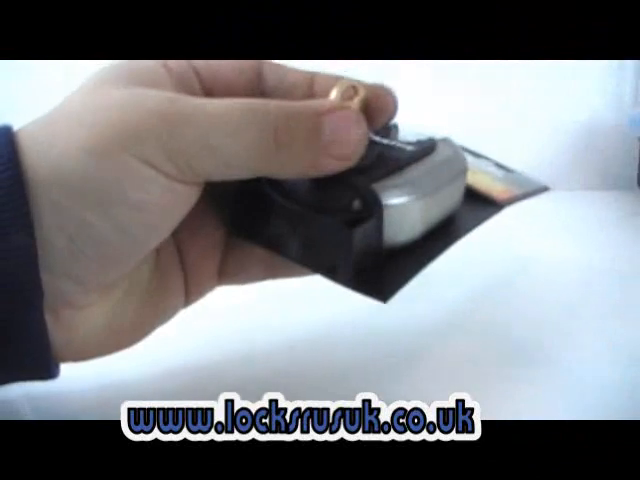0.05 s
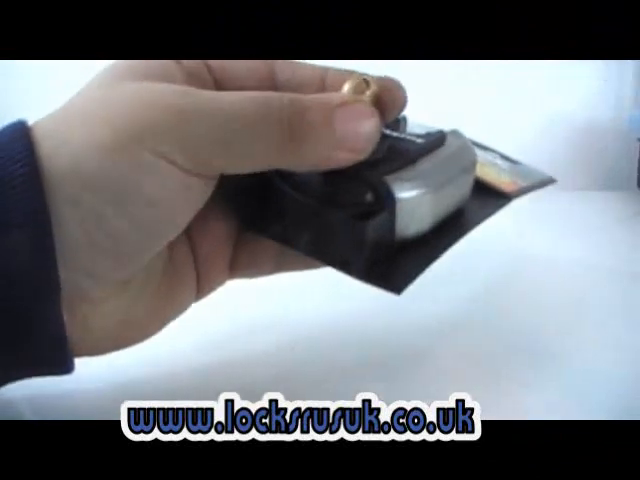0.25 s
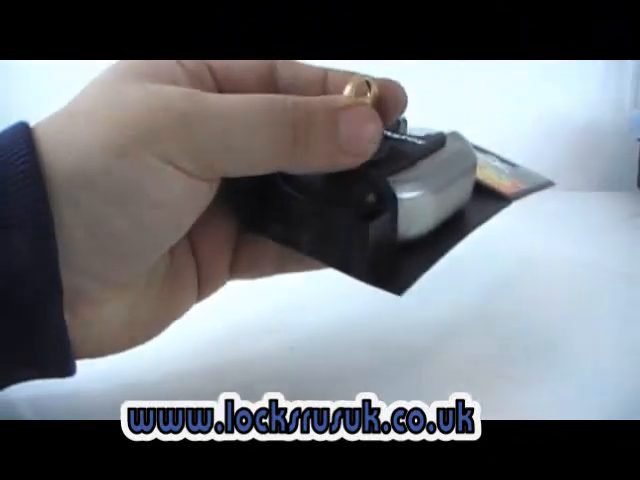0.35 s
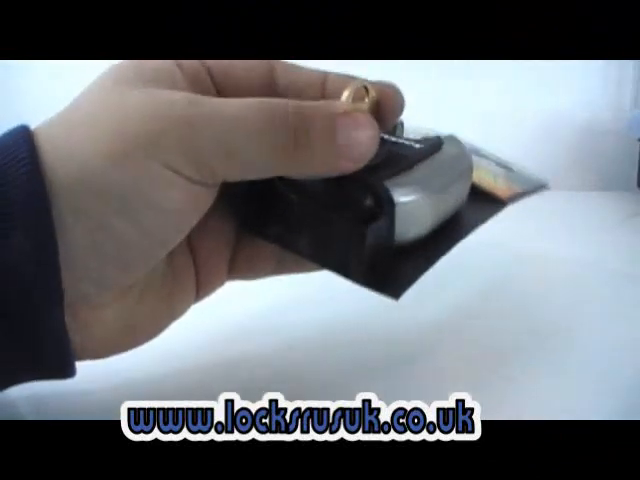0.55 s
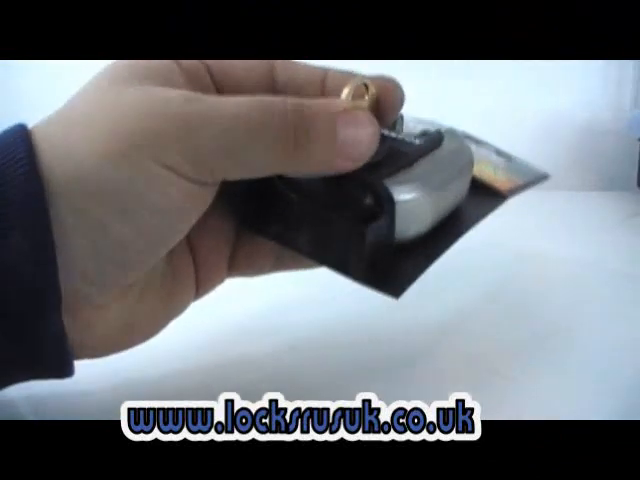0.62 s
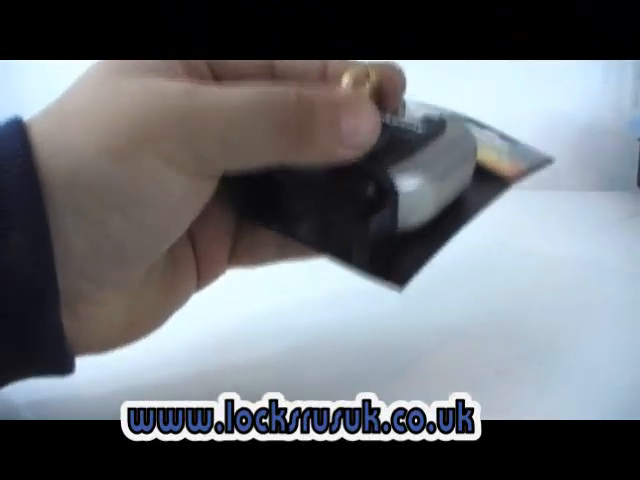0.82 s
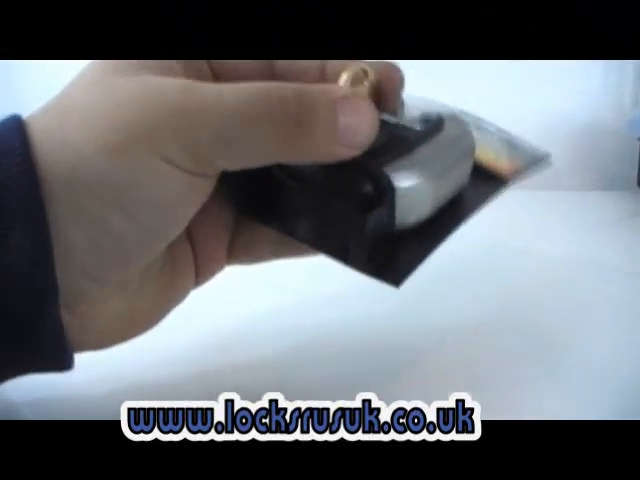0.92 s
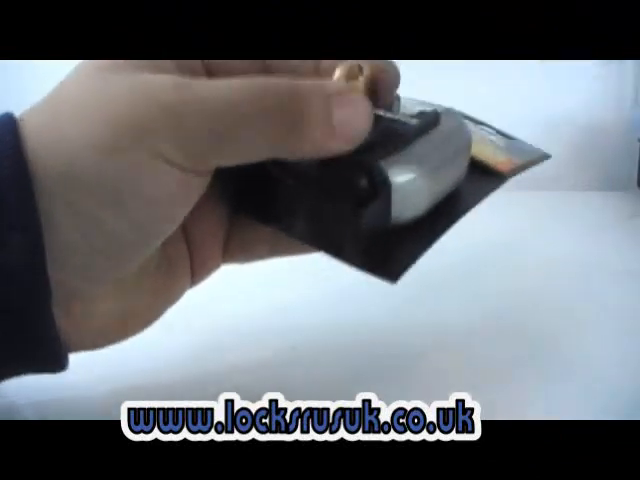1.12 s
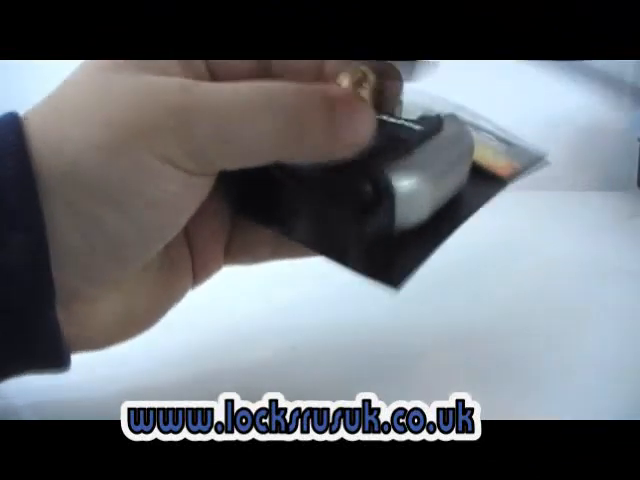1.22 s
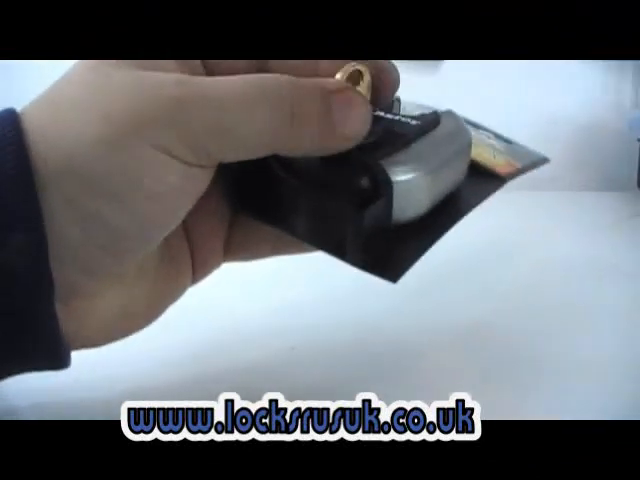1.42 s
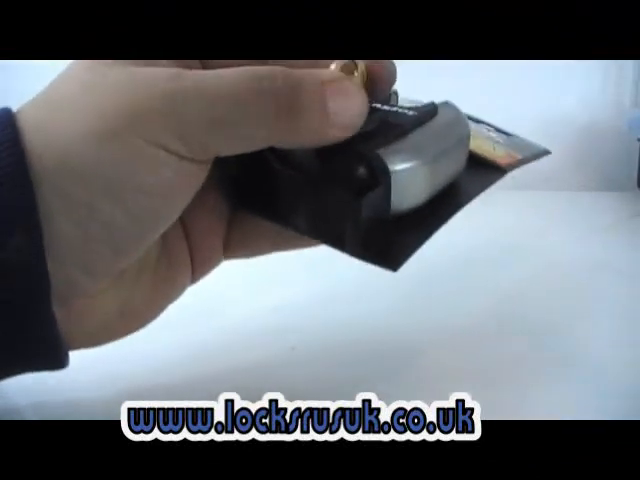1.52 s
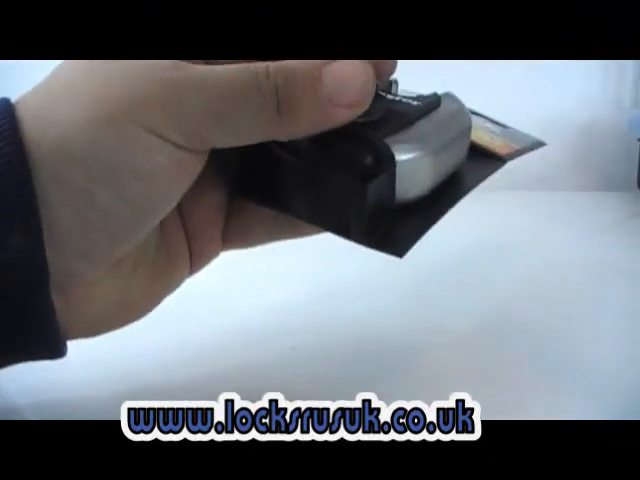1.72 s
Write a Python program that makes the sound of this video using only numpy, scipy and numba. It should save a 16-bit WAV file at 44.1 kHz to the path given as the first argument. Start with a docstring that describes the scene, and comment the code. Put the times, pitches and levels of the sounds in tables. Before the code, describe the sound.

Eight quick, sharp metal clicks with a slight rattle come from a hand-held padlock.

```python
"""A quiet room, a small camera microphone close to a hand-held padlock that is tapped eight times.
Each tap cracks on the lock body, rings its plastic case and thumps the hand; the loose steel parts
then bounce a few times. The room rings on behind, over soft air and a faint hum. The loudest taps
overload the input, and gain control turns the room noise down."""
import sys
import numpy as np
from scipy import signal
from scipy.fft import rfft, irfft
from scipy.io import wavfile
from numba import njit

SR = 44100
rng = np.random.default_rng(int(sys.argv[2]) if len(sys.argv) > 2 else 0)


def bounce(signal):
    """Save signal as a 16-bit WAV file at the path given by the first command-line argument."""
    frames = np.transpose(np.atleast_2d(signal))
    limited = np.clip(frames, -1, 1)
    pcm = np.round(limited * 32767).astype(np.int16)
    wavfile.write(sys.argv[1], SR, pcm)


N = 77175

# Taps on the lock. Each row: start in seconds, level in dB, thump offset in dB, case offset in dB,
# brightness of the body in dB per octave.
LOCK_TAPS = [(.2145, -17, 3, 6.5, -5.5), (0.4045, -4.5, 2.5, -6, 1.5), (0.5888, -1, -12, -1.5, -2),
             (.7657, 0.5, -0.5, -5, 0.5), (.9371, 1.5, -6, -7.5, 0), (1.105, 1, -33, -0.5, 1.5),
             (1.2793, 1, -7, -1.5, -5.5), (1.4597, 1, -5.5, -2, 1.5)]
# Bounces of the loose steel parts. Each row: landing time in seconds, level in dB.
STEEL_BOUNCES = [(.2192, -30), (0.2215, -26), (0.4121, -9.5), (0.417, -16), (0.4213, -9.5), (0.4399, -8),
                 (0.5953, -4), (.6056, -14), (0.623, -5.5), (0.6271, -10), (0.7722, -1), (0.782, -14),
                 (0.7968, -4.5), (0.8167, -14.5), (0.9421, -1.5), (0.9516, -7), (0.961, -20), (0.9677, -1),
                 (0.989, -17), (1.1112, 1.5), (1.1196, -3), (1.137, 1), (1.1575, -5.5), (1.285, 3),
                 (1.2944, -30), (1.3123, 1), (1.3342, -28), (1.338, -12), (1.4646, -0.5), (1.4753, -7),
                 (1.4909, -11.5), (1.6795, -27.5), (1.687, -31.5)]
# Modes of the lock body, the plastic case and the loose steel.
# Each row: frequency in Hz, level in dB, seconds to fall by 60 dB.
BODY_MODES = [(2142, -11.5, .012), (2910, -7.5, 0.012), (4284, 1, 0.0083), (4400, -19.5, 0.019),
              (5020, -2.5, .013), (5810, -2, 0.0059), (6700, -1.5, 0.012), (7260, -3, 0.014),
              (8020, -7, 0.015), (9250, -2, 0.01), (10330, -17.5, 0.024)]
CASE_MODES = [(410, -33, 0.3), (646, -24, 0.22), (659.7, -4.5, 0.021), (890, 2, 0.0097), (1319, 1, 0.011),
              (1880, -6.5, 0.011)]
STEEL_MODES = [(2338, -6.5, 0.022), (3140, -12, 0.055), (4260, 1.5, 0.016), (4533, -3.5, 0.017),
               (4680, -8.5, 0.0072), (4833, 3, 0.016), (5225, 2, 0.021), (6120, -1.5, 0.0094),
               (6680, -3.5, 0.032), (8200, -4, 0.023), (8600, -1, 0.051), (9040, -3.5, 0.016),
               (10640, 1, 0.0081), (11380, -5, 0.015)]
# Spectra of a tap's crack, of scraping steel, of the echo off the walls and of the room's air.
# Each row: frequency in Hz, relative level in dB.
CRACK_SPECTRUM = [(300, -65), (1000, -0.5), (2500, 1.5), (4300, -3), (7000, 5.5), (9500, -7), (12000, -9.5),
                  (16000, -56)]
SCRAPE_SPECTRUM = [(200, -26.5), (900, -18), (2200, -12), (3500, -17.5), (4400, 0.5), (6500, -4), (9000, 2),
                   (12000, -12.5), (16000, -16)]
WALL_SPECTRUM = [(100, -30), (230, -6.5), (340, 2), (520, -7.5), (1200, -4), (2300, 4), (3500, 1.5),
                 (4400, -0.5), (7000, -2.5), (9000, -4.5), (12500, -3)]
AIR_SPECTRUM = [(30, -5), (80, -11.5), (150, -7), (240, -4), (330, 0), (520, -7.5), (690, -6), (950, -7),
                (1500, -13.5), (2900, -15), (4100, -24.5), (9600, -30), (11500, -42.5), (13000, -88)]
# Stereo width close to the lock and out in the room. Each row: frequency in Hz, side against mid in dB.
CLOSE_WIDTH = [(400, -4), (1500, -23.5), (5000, -9.5), (8000, -7.5), (12000, 0)]
ROOM_WIDTH = [(40, -4), (130, -4), (320, -10), (700, -6.5), (1500, -11.5), (3200, -9), (6000, -18),
              (10000, -7)]

BODY_DB, CASE_DB, CRACK_DB, CRACK_T60_S = -1.5, -7.5, 6, 0.009
THUMP_DB, THUMP_S, JOLT_DB, JOLT_S, REBOUND = -14, 0.00078, -14.5, 0.00029, 0.58
CHATTER_DB, CHATTER_T60_S, CHATTER_DELAY_S = -18, 0.14, 0.0088
STEEL_DB, SCRAPE_DB, GRAZE_DB, GRAZE_LEAD_S = -13.5, 11, -9, 0.0011
SCUFF_DB, SCUFF_T60_S = -4.5, 0.006
DETUNE, STEREO_PHASE_RAD = 0.006, 0.18
ECHO_DB, ECHO_DELAY_S, DULL_T60_S, BRIGHT_T60_S = -12.5, 0.0093, 0.42, 0.44
AIR_DB, HUM_DB, HUM_HZ = -47.5, -56.5, 303.2
AGC_THRESHOLD_DB, AGC_ATTACK_S, AGC_RELEASE_S = -23, 0.014, 4.4
CLIP_DB, LOW_CUT_HZ, HIGH_CUT_HZ = -1.5, 70, 12900


def taps():
    """Close up, each tap cracks, rings body and case and thumps the hand; chatter grows with force."""
    out, crack = np.zeros((2, 2, N))
    hiss = noise([(100, 0), (10000, 0)], CLOSE_WIDTH)
    chatter = noise(SCRAPE_SPECTRUM, CLOSE_WIDTH)
    thump = push(THUMP_S)
    jolt = push(JOLT_S) * np.array([[1], [-1]])  # sideways: opposite in left and right
    for start, db, thump_db, case_db, tilt_db in LOCK_TAPS:
        add(out, undb(db + BODY_DB) * ring(BODY_MODES, scatter_db=1, tilt_db=tilt_db), start)
        add(out, undb(db + CASE_DB + case_db) * ring(CASE_MODES, scatter_db=1, size=16384), start)
        add(crack, undb(db + CRACK_DB) * burst(hiss, CRACK_T60_S), start)
        add(out, undb(2 * db + CHATTER_DB) * burst(chatter, CHATTER_T60_S), start + CHATTER_DELAY_S)
        add(out, undb(db + THUMP_DB + thump_db) * thump + undb(db + JOLT_DB) * jolt, start)
    return out + colour(crack, CRACK_SPECTRUM)


def push(time_constant_s):
    """The hand takes a tap: one pressure pulse that swings back below zero."""
    age = np.arange(N) / SR / time_constant_s
    return age * (1 - REBOUND * age) * np.exp(1 - age)


def ring(modes, scatter_db, tilt_db=0, size=4096):
    """Struck modes die away; each contact excites them a little differently."""
    hz, db, t60 = np.array(modes).T[:, :, None]
    level_draw, tune_draw, phase_draw = rng.standard_normal((3, len(modes), 1))
    t = np.arange(size) / SR
    polarity = (-1) ** np.arange(len(modes))[:, None]
    mode_db = db + scatter_db * level_draw + tilt_db * np.log2(hz / 5000)
    envelopes = polarity * undb(mode_db) * fade(t60, size)
    phase = 2 * np.pi * hz * (1 + DETUNE * tune_draw) * t
    shift = STEREO_PHASE_RAD * phase_draw
    return np.array([(envelopes * np.sin(phase + side * shift)).sum(0) for side in (1, -1)])


def bounces():
    """Loose steel grazes its seat, then lands with a short bright ring."""
    out, force = np.zeros((2, 2, N))
    for landing, db in STEEL_BOUNCES:
        for start, touch_db in ((landing - GRAZE_LEAD_S, db + GRAZE_DB), (landing, db)):
            add(out, undb(touch_db + STEEL_DB) * ring(STEEL_MODES, scatter_db=1.5), start)
            add(force, undb(touch_db + SCRAPE_DB) * contact(), start)
    return out + colour(force, SCRAPE_SPECTRUM)


def contact(size=1024):
    """Force of a hard contact: one sharp spike and a brief rough scuff."""
    force = undb(SCUFF_DB) * rng.standard_normal(size) * fade(SCUFF_T60_S, size)
    force[0] = 1
    return force


def room_echo(source):
    """The walls return a diffuse tail that reaches the microphone just after the direct sound."""
    wash = noise(WALL_SPECTRUM, ROOM_WIDTH)
    dull = colour(wash, [(2500, -12), (7000, -28)])
    tail = dull * fade(DULL_T60_S) + (wash - dull) * fade(BRIGHT_T60_S)
    tail *= undb(ECHO_DB) / np.sqrt((tail ** 2).sum() / 2)
    out = np.zeros((2, N))
    add(out, signal.fftconvolve(source.mean(0)[None], tail, axes=1), ECHO_DELAY_S)
    return out


def room_tone():
    """Soft steady air in the background, with a faint fan-like hum."""
    hum = np.sqrt(2) * np.sin(2 * np.pi * HUM_HZ * np.arange(N) / SR)
    return undb(AIR_DB) * noise(AIR_SPECTRUM, ROOM_WIDTH) + undb(HUM_DB) * hum


def undb(db):
    """Decibels to gain."""
    return 10 ** (np.asarray(db) / 20)


def fade(t60, size=N):
    """Exponential decay, 60 dB down after t60 seconds."""
    return np.exp(-np.log(1000) * np.arange(size) / SR / t60)


def colour(x, spectrum):
    """Filter by a curve of (Hz, dB) points."""
    hz, db = np.array(spectrum).T
    bin_hz = np.maximum(np.fft.rfftfreq(N, 1 / SR), 1)
    return irfft(rfft(x) * undb(np.interp(np.log(bin_hz), np.log(hz), db)), N)


def noise(spectrum, width):
    """Coloured mid-side noise, as left and right of rms 1."""
    mid, side = colour(rng.standard_normal((2, N)), spectrum)
    side = colour(side, width)
    stereo = np.array([mid + side, mid - side])
    return stereo / stereo.std()


def burst(hiss, t60, size=8192):
    """A random piece of noise that dies away."""
    first = rng.integers(N - size)
    return hiss[:, first:first + size] * fade(t60, size)


def add(out, x, start_s):
    """Mix x into out from start_s on."""
    first = int(np.clip(start_s * SR, 0, N - 1))
    count = min(x.shape[-1], N - first)
    out[:, first:first + count] += x[..., :count]


@njit
def follow(x, attack, release):
    """Level follower that rises at the attack rate and falls at the release rate."""
    levels, level = np.empty(len(x)), 0.
    for i in range(len(x)):
        level += (x[i] - level) * (attack if x[i] > level else release)
        levels[i] = level
    return levels


def scene():
    """At the microphone: the lock up close, its echo and the room tone behind."""
    lock = taps() + bounces()
    return lock + room_echo(lock) + room_tone()


def record(dry):
    """The camera's gain ducks on hard taps; its input clips softly, and deep bass and the top are cut."""
    level = follow(abs(dry).mean(0), 1 / (AGC_ATTACK_S * SR), 1 / (AGC_RELEASE_S * SR))
    gain = np.minimum(1, undb(AGC_THRESHOLD_DB) / (level + 1e-9)) ** 0.5  # 2:1 above the threshold
    clipped = undb(CLIP_DB) * np.tanh(dry * gain / undb(CLIP_DB))
    low_cut = signal.butter(1, LOW_CUT_HZ, "high", fs=SR, output="sos")
    high_cut = signal.ellip(8, 0.2, 60, HIGH_CUT_HZ, fs=SR, output="sos")
    return signal.sosfilt(high_cut, signal.sosfilt(low_cut, clipped))


dry = scene()
out = record(dry)
bounce(out)
```